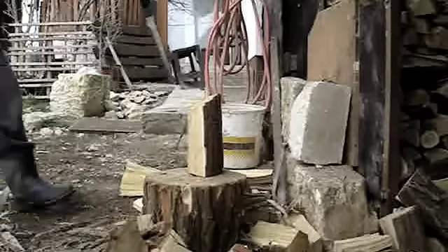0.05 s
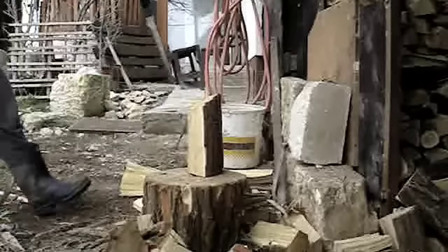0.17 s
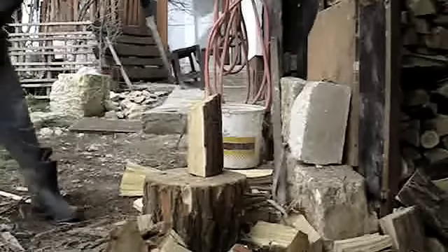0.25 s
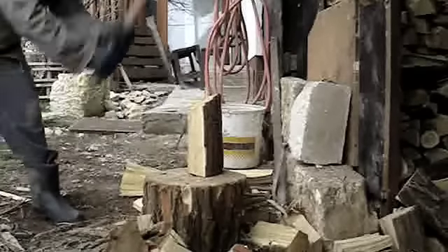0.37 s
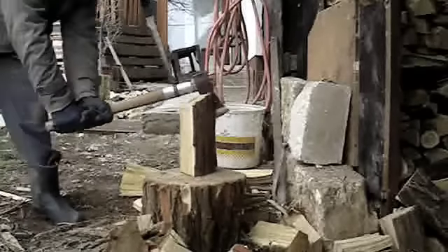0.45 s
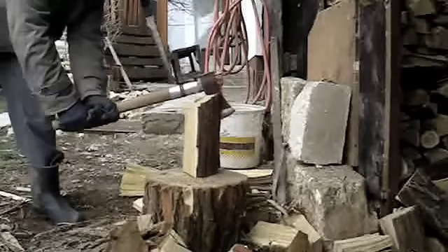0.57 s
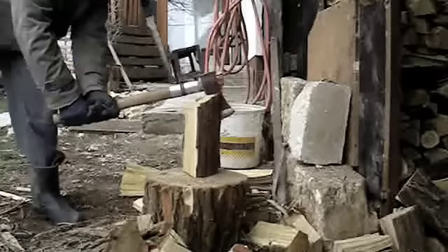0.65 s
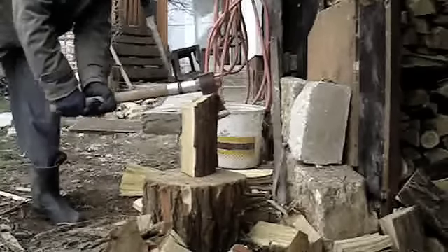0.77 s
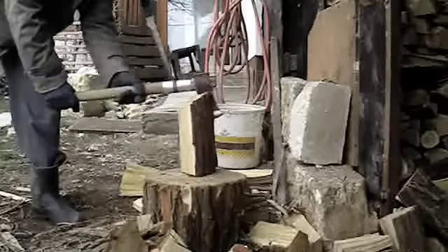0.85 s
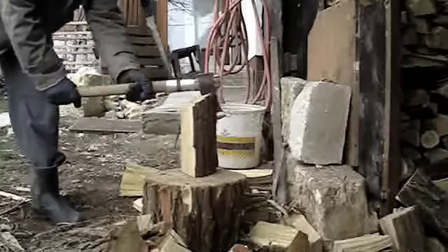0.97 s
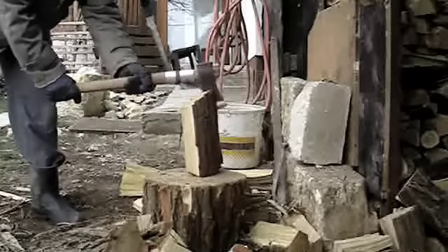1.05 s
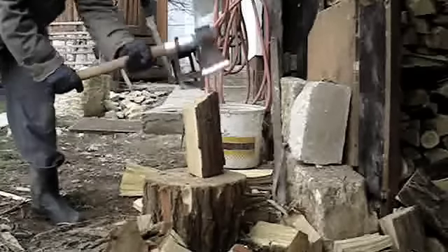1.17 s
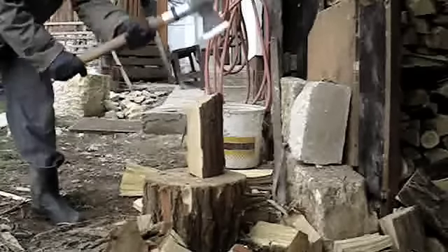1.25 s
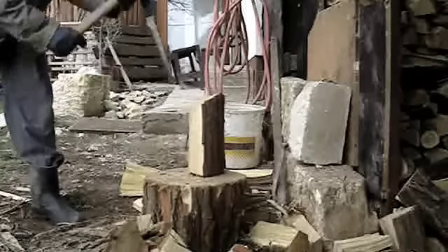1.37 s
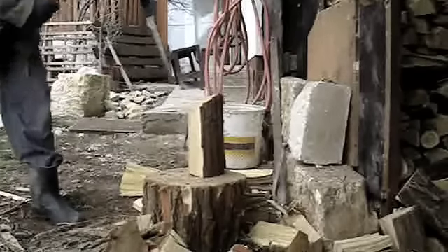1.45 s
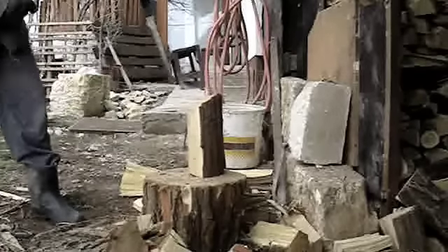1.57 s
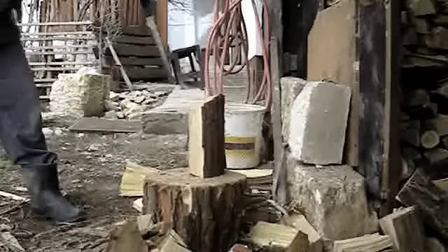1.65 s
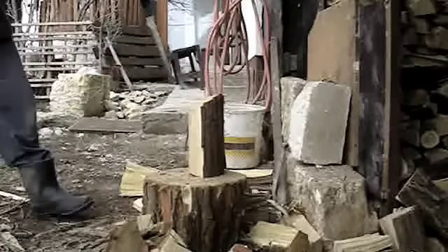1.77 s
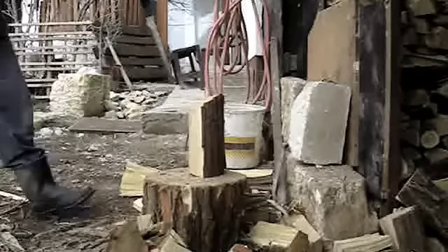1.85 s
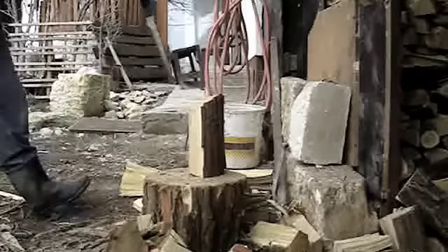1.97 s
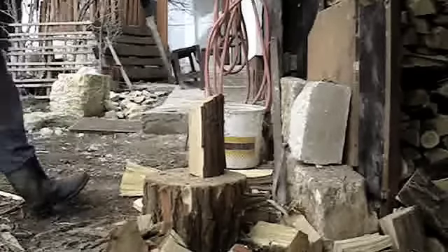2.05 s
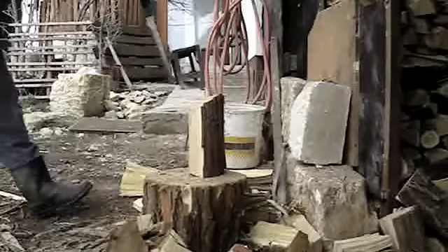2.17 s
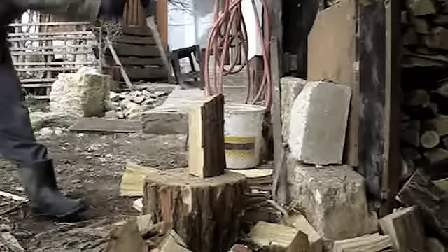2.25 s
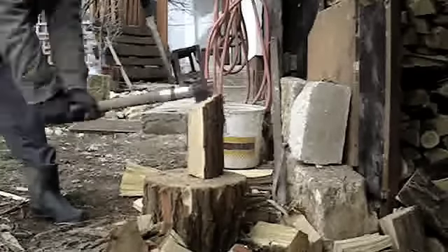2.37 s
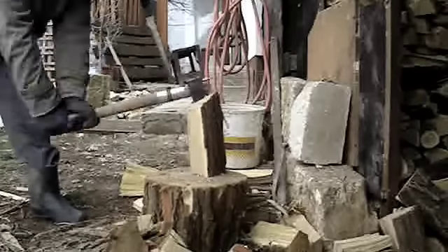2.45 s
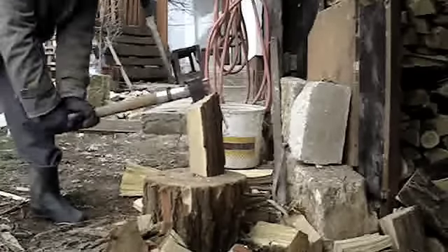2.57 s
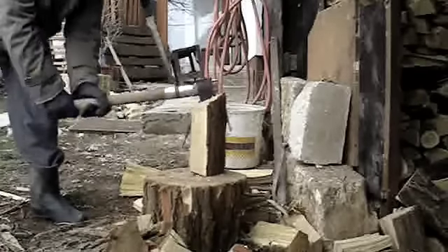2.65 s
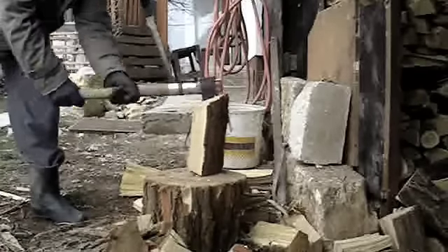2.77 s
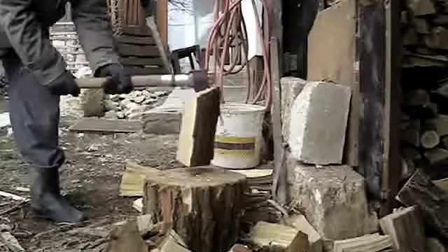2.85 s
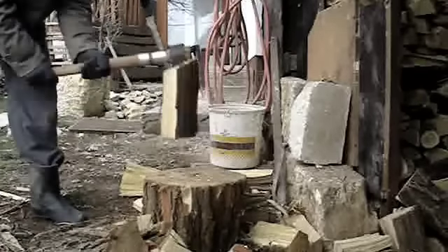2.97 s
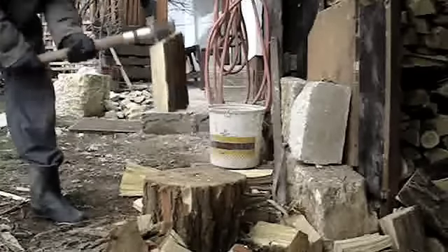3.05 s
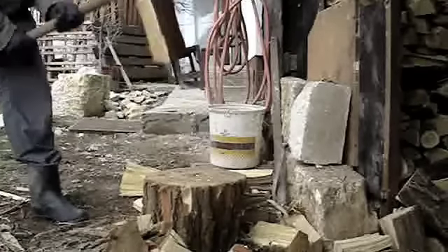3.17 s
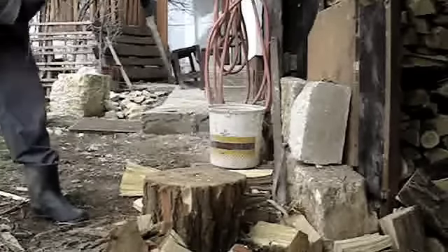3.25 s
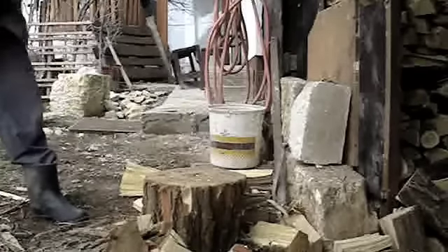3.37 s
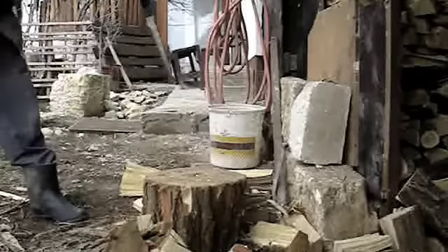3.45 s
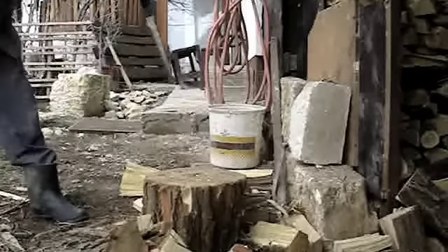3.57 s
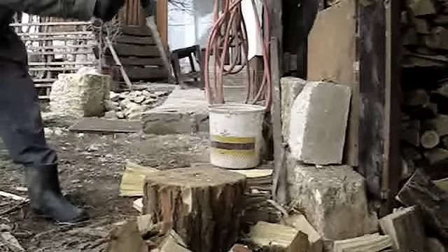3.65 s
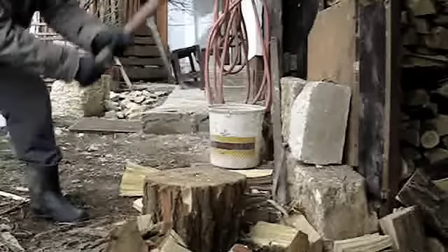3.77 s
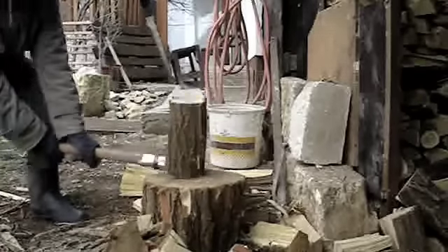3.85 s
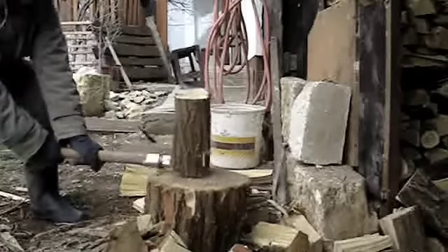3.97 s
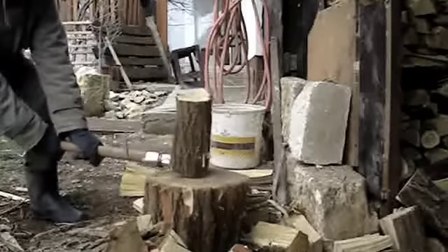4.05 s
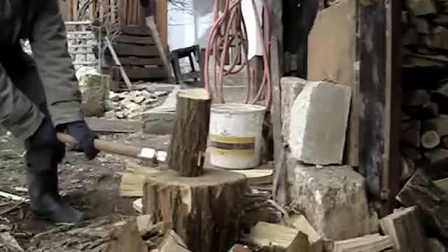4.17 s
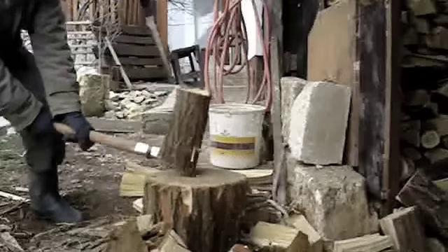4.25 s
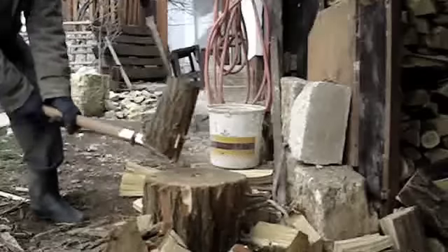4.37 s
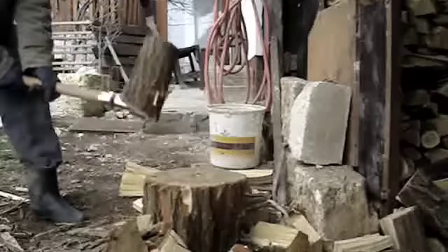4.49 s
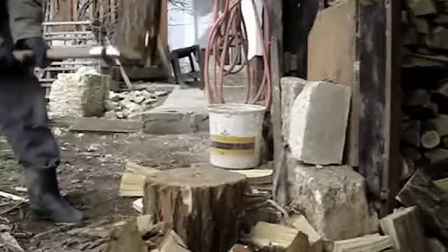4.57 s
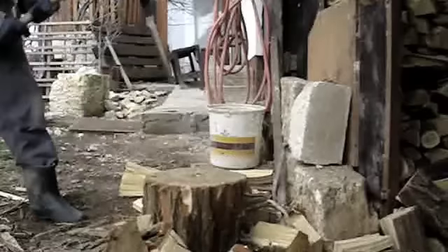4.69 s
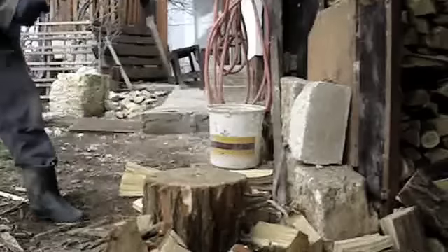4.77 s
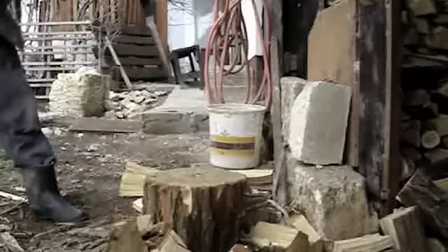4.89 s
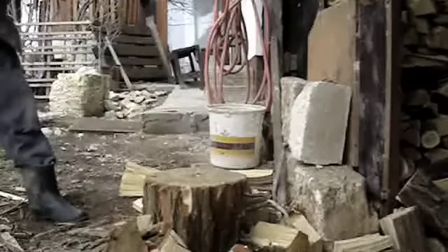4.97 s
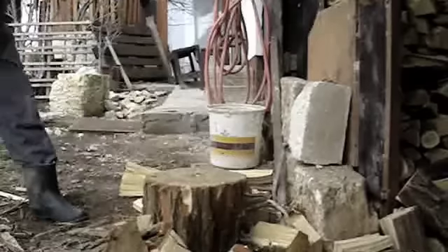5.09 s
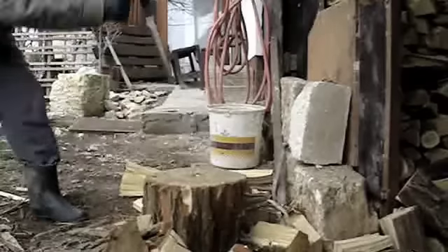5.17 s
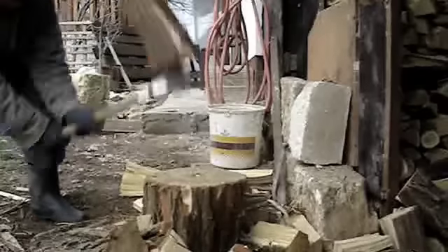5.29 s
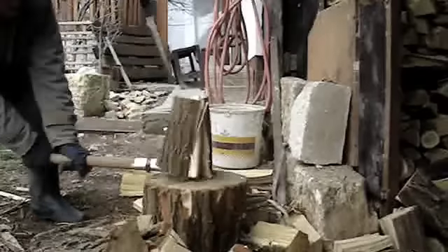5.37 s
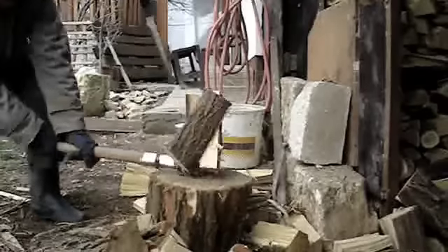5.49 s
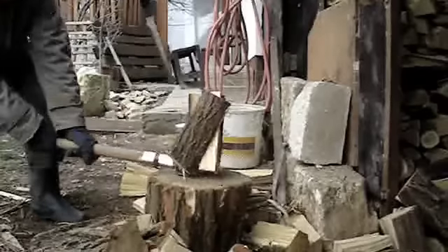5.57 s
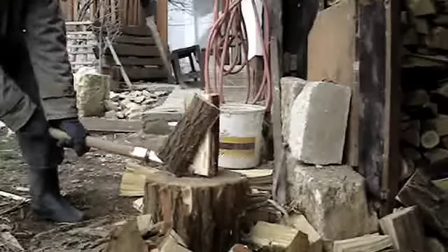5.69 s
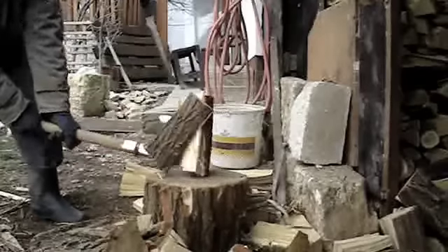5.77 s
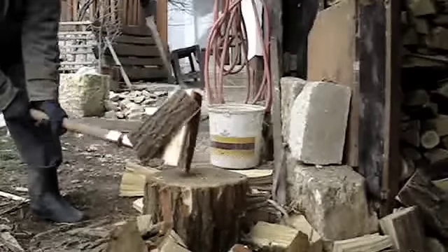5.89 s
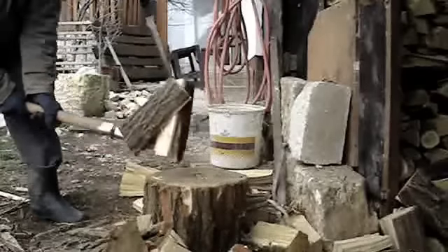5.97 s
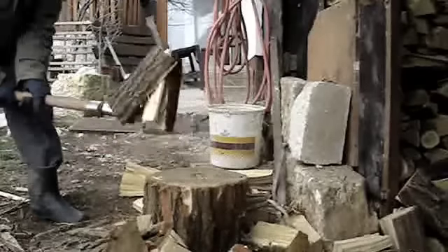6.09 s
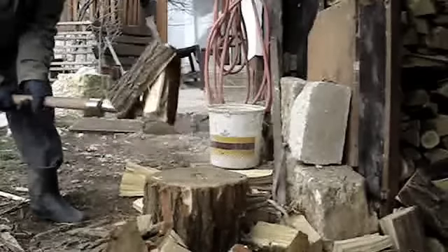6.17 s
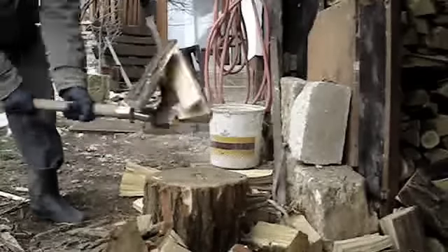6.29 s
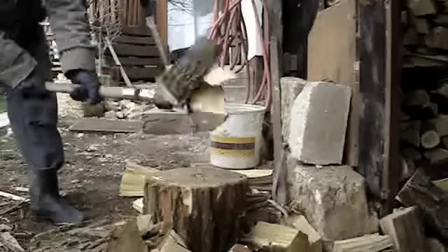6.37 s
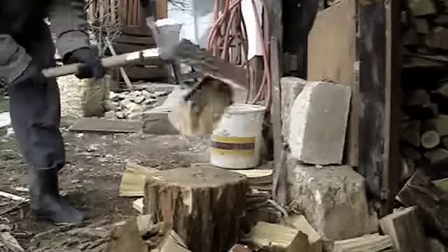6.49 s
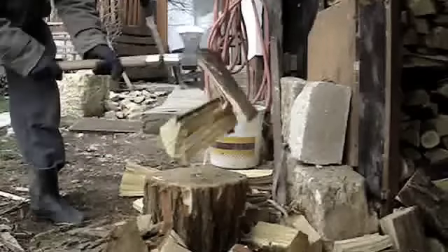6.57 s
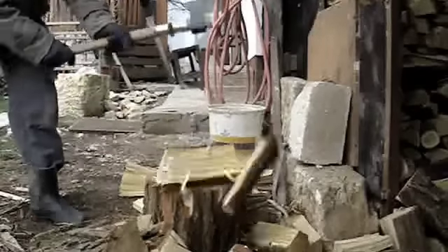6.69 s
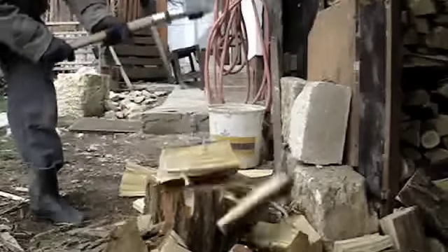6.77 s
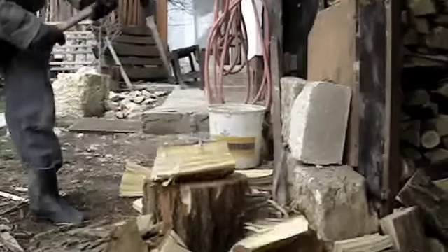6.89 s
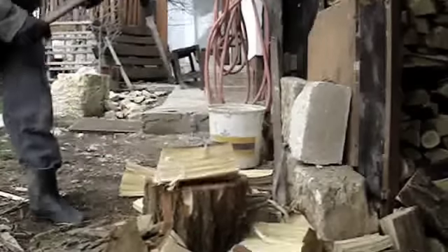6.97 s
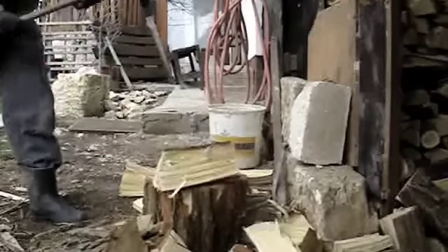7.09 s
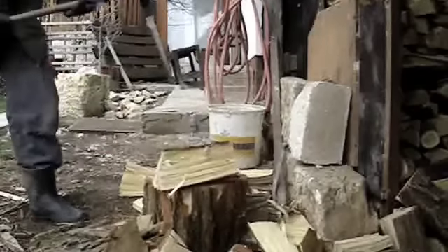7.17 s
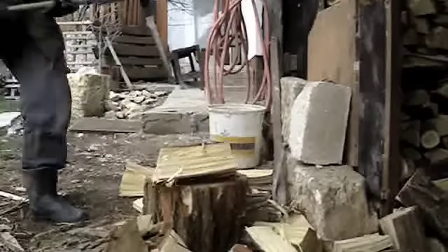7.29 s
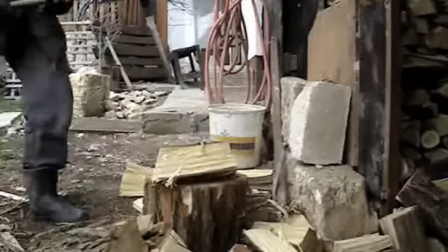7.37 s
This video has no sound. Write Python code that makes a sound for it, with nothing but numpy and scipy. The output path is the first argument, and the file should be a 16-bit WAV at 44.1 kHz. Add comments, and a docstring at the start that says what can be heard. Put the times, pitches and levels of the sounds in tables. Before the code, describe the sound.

An axe splits firewood close to the microphone in a small walled yard. At about 0.5 seconds a sharp chop sinks the blade into a log, with a brief ring of wood and steel and a short echo. Faint creaks and a hollow knock follow around 1.2 seconds. A second chop lands at 2.5 seconds. At 4 and 5.5 seconds two more cracking blows drive axe and log onto the block, each followed by small knocks. Sleeves and boots rustle softly between the early blows. From 6.3 seconds the wedged blade creaks, fibres tear and splinters snap. Around 6.8 to 7.1 seconds the halves drop onto pile and block with dry clacks, a scrape and a heavy bouncing thud, then a couple of light ticks. Underneath are quiet outdoor air, a distant low drone that fades away and a very faint high whine, all dipping after each blow and creeping back.

```python
"""An axe splits firewood in a small walled yard, close to a camera.
Two chops sink the blade into a log; two more blows drive axe and log onto the block until it splits.
Wood and steel ring, the wedged blade creaks, the last fibres tear, the halves drop on pile and block.
Clothes and boots rustle in between, over outdoor air, a far drone and a thin camera whine.
The camera's gain control flattens each blow and lets the background creep back afterwards."""
import sys
import numpy as np
from scipy import signal
from scipy.fft import rfft, irfft
from scipy.io import wavfile
from scipy.ndimage import uniform_filter1d, minimum_filter1d

SR = 44100
rng = np.random.default_rng(int(sys.argv[2]) if len(sys.argv) > 2 else 0)


def pcm_store(signal):
    """Save signal as 16-bit PCM."""
    levels = np.round(np.clip(np.atleast_2d(signal), -1, 1) * 32767)
    wavfile.write(sys.argv[1], SR, levels.astype(np.int16).T)


N = 327663
TIME = np.arange(N) / SR
HIT_TIME = TIME[:2 ** 15]
HIT_HZ = np.fft.rfftfreq(2 ** 15, 1 / SR)


def chops(overtone_ratio=1.87, overtone_db=4, log_width_hz=190, blade_width_hz=200,
          steel_db=-20, thump_db=-20, crack_db=-11):
    """The blade cracks in, log and steel ring on, and the block thumps the ground."""
    # Each row: start in s, relative level in dB, log pitch in Hz, log ring in dB, blade pitch in Hz,
    # blade ring in dB, tilt in dB/octave, bass in dB, wood t60 in s.
    blows = [(0.535, 1.5, 775, 9, 1870, 7, 0.5, -1, 0.29), (2.477, 0, 1010, 4, 2010, 9.5, -1, -11.5, 0.29),
             (3.9876, -0.5, 890, 9.5, 1490, 3.5, -0.5, -1, 0.24),
             (5.4715, 1.5, 920, 5, 1913, 9.5, 2, -4, 0.27)]
    # Crowded modes of log and block. Each row: frequency in Hz, density in dB.
    wood_spectrum = [(40, -19.5), (120, -32), (200, -10), (320, -0.5), (450, 0), (700, 0.5), (1200, 0),
                     (1550, 0), (2700, -3.5), (3700, -7), (5200, -10.5), (6500, -15.5), (10000, -24.5)]
    # Axe head wedged in the log. Each row: frequency in Hz, level in dB, t60 in s.
    axe_modes = [(1773, -2, 0.16), (1738, -12.5, 0.4), (1864, -5, 0.26), (1943, -5.5, .22),
                 (1990, -6, 0.36), (2200, -14, .28), (2300, -12, .24), (2760, -9.5, 0.44),
                 (3480, -17, 0.26), (3500, -22, .22)]
    crack_colour = spectrum([(100, -11), (900, -3.5), (4000, -9), (10000, -17)], HIT_HZ)
    thump_colour = spectrum([(20, -3), (70, -4), (200, -20.5), (600, -47)], HIT_HZ)
    octaves = np.log2(np.maximum(HIT_HZ, 500) / 1500)
    out = np.zeros(N)
    for start_s, db, log_hz, log_db, blade_hz, blade_db, tilt_db_per_oct, bass_db, t60_s in blows:
        colour = spectrum(wood_spectrum, HIT_HZ) + tilt_db_per_oct * octaves + bass_db * hump(230, 600)
        colour += log_db * hump(log_hz, log_width_hz) + blade_db * hump(blade_hz, blade_width_hz)
        colour += overtone_db * hump(overtone_ratio * blade_hz, 2 * blade_width_hz)
        wood = shape_hit(contact(t60_s, scatter_db=4.5), colour)
        steel = unit(sum(amp(mode_db) * rng.choice([-1, 1]) * mode(hz, ring_s)
                         for hz, mode_db, ring_s in axe_modes))
        crack = amp(crack_db) * shape_hit(contact(0.062, scatter_db=8), crack_colour)
        thump = amp(thump_db) * shape_hit(contact(0.032, scatter_db=11), thump_colour)
        add_hit(out, start_s, db, wood + amp(steel_db + blade_db) * steel + crack + thump)
    return out


def thuds(rise_s=0.0016, grit_db=-7):
    """Heavy wood lands and bounces: a blunt push rings the block, bark and chips crunch under it."""
    # Each row: start in s, level in dB, hardness in dB/octave, base t60 in s.
    landings = [(6.793, -33, -8, 0.05), (6.9027, 2.5, -2, 0.044), (6.936, -7.5, -5.5, 0.025),
                (6.9638, -21, -9, 0.067), (7.022, -27, -7, 0.063), (7.0702, -21, -0.5, 0.054),
                (7.089, -24, 0, 0.025), (7.0954, -15.5, -2, 0.049)]
    # Dull chopping block. Each row: nominal frequency in Hz, level in dB, t60 factor.
    block_modes = [(166, -13, 1.34), (227.5, -2.5, 0.78), (310, -5, 1.5), (457, -0.5, 0.83), (534, 2, 0.65),
                   (763, 21, 0.11), (952, 3.5, 0.7), (1294, -8, 1.4), (1663, -13, 1.7)]
    grit_colour = spectrum([(30, -40), (130, -4.5), (450, -7.5), (900, 1.5), (2000, -10),
                            (4000, -35.5), (10000, -22)], HIT_HZ)
    octaves = np.log2(np.maximum(HIT_HZ, 300) / 600)
    out = np.zeros(N)
    for start_s, db, tilt_db_per_oct, t60_s in landings:
        body = np.zeros(len(HIT_TIME))
        for hz, mode_db, t60_factor in block_modes:
            gain = amp(mode_db + tilt_db_per_oct * np.log2(hz / 600)) * rng.choice([-1, 1])
            body += gain * mode(hz * rng.uniform(0.916, 1.06), t60_s * t60_factor)
        body *= 1 - np.exp(-HIT_TIME / rise_s)
        grit = shape_hit(contact(t60_s, scatter_db=1), grit_colour + tilt_db_per_oct * octaves)
        add_hit(out, start_s, db, unit(body) + amp(grit_db) * grit)
    return out


def clacks(bass_db_per_oct=-17):
    """Dry wood hits block and pile: broad faces sound low and full, edges high and thin."""
    # Each row: start in s, level in dB, pitch in Hz, treble in dB, t60 in s.
    hits = [(4.2808, -21.5, 2450, -26, 0.022), (6.7869, -18, 1660, -20, 0.052),
            (6.7911, -5, 1230, -18.5, 0.024), (6.805, -25, 1230, -32, 0.044),
            (6.8173, -21, 1300, -11, 0.0075), (6.837, -19.5, 2500, -9, 0.025),
            (6.867, -28, 1800, -7, 0.051), (6.9009, -15, 2360, -9.5, 0.02), (6.918, -20, 1770, -16, 0.028),
            (7.270, -26, 2540, -12, 0.068), (7.420, -35, 1700, -4, 0.019)]
    out = np.zeros(N)
    for start_s, db, hz, treble_db, t60_s in hits:
        bass_db = -8 + bass_db_per_oct * np.log2(hz / 1700)
        add_hit(out, start_s, db, wood_hit(hz, t60_s, bass_db, treble_db, ring_db=-11))
    return out


def knocks(t60_s=0.044, bass_db=-25):
    """Log, blade and block bump together: short, hollow, equally damped."""
    # Each row: start in s, level in dB, pitch in Hz, treble in dB, relative ring in dB.
    bumps = [(1.2467, -21, 290, -60, -5.5), (1.2467, -18, 1670, -44, 2.5), (1.575, -38.5, 320, -50, -4),
             (1.850, -39, 1100, -14, -7), (4.28, -26, 1070, -48, 18), (5.436, -20, 900, -52, -7),
             (5.454, -6.5, 920, -37, -17), (5.7018, -23.5, 910, -26, -6), (5.7278, -25, 1320, -35, -15),
             (5.9073, -24, 1754, -40, 1), (6.131, -37.5, 1040, -67, 8), (6.469, -19, 690, -34, -9),
             (6.499, -22, 885, -36, -12)]
    out = np.zeros(N)
    for start_s, db, hz, treble_db, ring_db in bumps:
        add_hit(out, start_s, db, wood_hit(hz, t60_s, bass_db, treble_db, ring_db))
    return out


def creaks():
    """Wood slips on the wedged blade; each slip starts with a click and rings briefly at one pitch."""
    # Each row: start in s, level in dB, pitch in Hz, t60 in s.
    slips = [(0.869, -34.5, 1900, 0.033), (1.166, -32.5, 1860, 0.34), (1.208, -30.5, 1740, 0.075),
             (6.3287, -26.5, 2510, 0.1), (6.4051, -21, 2600, 0.042), (6.458, -22, 2680, 0.038),
             (6.5201, -16, 2750, 0.027), (6.618, -37, 2400, 0.021)]
    out = np.zeros(N)
    for start_s, db, hz, t60_s in slips:
        creak = wood_hit(hz, t60_s, bass_db=-32, treble_db=-23, ring_db=-2, rise_share=0.03)
        add_hit(out, start_s, db, creak)
    return out


def snaps(pitch_hz=3000):
    """Thin splinters and twigs break, all with one bright colour."""
    # Each row: start in s, level in dB, t60 in s.
    breaks = [(0.241, -37.5, 0.014), (0.36, -39.5, 0.04), (1.716, -32, 0.03), (3.405, -45.5, 0.033),
              (4.398, -41, 0.045), (5.412, -29, 0.073), (5.8013, -31.5, 0.04), (6.503, -18.5, 0.018),
              (6.511, -18.5, 0.037), (6.642, -39.5, 0.024), (7.119, -34.5, 0.033)]
    out = np.zeros(N)
    for start_s, db, t60_s in breaks:
        snap = wood_hit(pitch_hz, t60_s, bass_db=-7, treble_db=-8.5, ring_db=-19, overtone_db=-30)
        add_hit(out, start_s, db, snap)
    return out


def tearing(clump_db=3, growth_power=0.93):
    """Fibres part in bunches, louder until the wood gives; splintered faces scrape down the pile."""
    # Each row: start in s, build-up in s, peak in dB, decay in dB/s.
    tears = [(5.377, 0.098, -20, 1997), (6.289, 0.23, -25.5, 302), (6.785, 0.077, -28, 61)]
    # Fibre rasp. Each row: frequency in Hz, density in dB.
    rasp_spectrum = [(100, -6), (400, -9), (900, -1), (1350, 1.5), (1750, 11), (2100, -3), (2600, 5.5),
                     (5000, -1), (10000, -11.5)]
    envelope = np.zeros(N)
    for start_s, build_s, peak_db, fall_db_per_s in tears:
        strain = np.clip((TIME - start_s) / build_s, 0, 1)
        since_peak_s = np.maximum(TIME - start_s - build_s, 0)
        envelope += strain ** growth_power * amp(peak_db - fall_db_per_s * since_peak_s)
    clumps = amp(clump_db * flutter())
    return envelope * shape_noise(clumps * grains(N, per_s=2700, spread_db=3.5), rasp_spectrum)


def rustles():
    """Sleeves and boots brush; each movement swells and dies as fine-grained noise."""
    # Each row: centre in s, length in s, level in dB.
    moves = [(0.141, 0.13, -35), (0.378, 0.063, -61), (0.957, 0.32, -37), (1.529, 0.29, -43.5),
             (1.696, 0.21, -39.5), (2.088, 0.19, -36.5), (2.848, 0.21, -39.5), (3.55, 0.44, -41),
             (6.705, 0.42, -51.5)]
    # Rubbing cloth. Each row: frequency in Hz, density in dB.
    cloth_spectrum = [(100, -15), (500, -10.5), (1400, 2.5), (4000, -2), (7000, -6.5), (10000, -10)]
    swell = sum(amp(db) * np.cos(np.pi * np.clip((TIME - centre_s) / length_s, -.5, .5)) ** 2
                for centre_s, length_s, db in moves)
    return swell * shape_noise(grains(N, per_s=12000, spread_db=4.5), cloth_spectrum)


def background(air_db=-45, whine_db=-66, whine_hz=8050, waver_hz=25):
    """Outdoor hush, a far low drone and a thin wavering whine from the camera."""
    # Air with microphone hiss, and the drone. Each row: frequency in Hz, density in dB.
    air_spectrum = [(20, 1), (55, 3), (110, 0), (250, -2), (520, 1.5), (850, 3.5), (1300, 0.5), (2200, -2),
                    (4000, -7), (7500, -8.5), (10000, -12.5)]
    drone_spectrum = [(20, 4), (40, 1), (58, 4.5), (85, 2), (200, 0), (400, 3.5), (800, 0.5), (2000, -27),
                      (8000, -57)]
    # Each row: time in s, drone level in dB.
    drone_levels = [(0, -46.5), (.5, -49), (1.3, -54.5), (2.1, -47.5), (2.4, -52), (3.2, -60.5), (5, -52),
                    (7.4, -93)]
    air = shape_noise(rng.standard_normal(N), air_spectrum)
    drone = shape_noise(rng.standard_normal(N), drone_spectrum)
    drone_db = np.interp(TIME, *np.transpose(drone_levels))
    pitch_hz = whine_hz + waver_hz * flutter()
    whine = unit_rms(np.sin(2 * np.pi * np.cumsum(pitch_hz) / SR))
    return amp(air_db) * air + amp(drone_db) * drone + amp(whine_db) * whine


def yard(x, build_s=0.0083):
    """Walls and woodpiles scatter the sound back; low mids last longest, little bass returns."""
    # Each row: frequency in Hz, t60 in s.
    decay_times = [(100, 0.18), (400, 0.37), (1000, 0.29), (2500, 0.29), (5000, 0.3), (10000, 0.23)]
    colour = [(100, -4.5), (400, 3.5), (1500, 4.5), (5000, 0.5), (10000, 5)]  # Hz, dB
    taps = grains(len(HIT_TIME), per_s=4000, spread_db=0) * (1 - np.exp(-(HIT_TIME / build_s) ** 2))
    hz, time_s, bands = signal.stft(taps, SR, nperseg=256)
    bands *= np.exp(-np.log(1000) * time_s / spectrum(decay_times, hz)[:, None])
    bands *= amp(spectrum(colour, hz))[:, None]
    return signal.fftconvolve(x, unit(signal.istft(bands, SR)[1]))[:N]


def wood_hit(hz, t60_s, bass_db, treble_db, ring_db, rise_share=0.016, overtone_db=-17):
    """A small contact is loudest near the pitch of the piece it shakes and falls away on both sides."""
    log_ratio = np.log(np.maximum(HIT_HZ, 90) / hz)
    below = np.maximum(log_ratio / np.log(150 / hz), 0)
    above = np.clip(log_ratio / np.log(8500 / hz), 0, 1.1)
    colour = bass_db * below ** 0.79 + treble_db * above ** 1.97 - 12 * hump(0, 100)
    # short contacts snap cleanly, long ones creak
    drive = contact(t60_s, scatter_db=3 + 7 * np.log2(t60_s / 0.031), rise_s=rise_share * t60_s)
    ring_s = 0.56 * t60_s
    bending_modes = mode(hz, ring_s) + amp(overtone_db) * mode(1.95 * hz, ring_s)
    shaken = irfft(rfft(drive) * rfft(bending_modes))
    ring = shape_hit(shaken, -24 * hump(0, 0.65 * hz))  # a small piece radiates little bass
    return shape_hit(drive, colour) + amp(ring_db + 5) * ring


def contact(t60_s, scatter_db, rise_s=0.00077):
    """One sharp push, then a dying spray of fibre clicks."""
    push = HIT_TIME == 0
    envelope = fade(t60_s) * (1 - np.exp(-HIT_TIME / rise_s))
    spray = envelope * grains(len(HIT_TIME), per_s=9000, spread_db=0)
    return amp(scatter_db) * unit(spray) - push


def grains(n, per_s, spread_db):
    """Random clicks; spread makes a few much larger than the rest."""
    size = amp(spread_db * np.minimum(rng.exponential(1, n), 4))
    return size * rng.choice([-1, 1], n) * (rng.random(n) < per_s / SR)


def flutter():
    """Smoothed noise, rms 1."""
    return unit_rms(uniform_filter1d(rng.standard_normal(N), size=300))


def mode(hz, t60_s):
    """One dying partial."""
    return np.sin(2 * np.pi * hz * HIT_TIME) * fade(t60_s)


def fade(t60_s):
    """Exponential decay."""
    return np.exp(-np.log(1000) * HIT_TIME / t60_s)


def hump(centre_hz, width_hz):
    """Resonance peak, height 1."""
    return 1 / (1 + (2 * (HIT_HZ - centre_hz) / width_hz) ** 2)


def spectrum(points, hz):
    """Interpolates (Hz, value) points over log frequency."""
    point_hz, value = np.transpose(points)
    return np.interp(np.log(hz + 1), np.log(point_hz + 1), value)


def shape_hit(x, colour_db):
    """Minimum-phase filter, so no pre-ring; energy 1."""
    log_gain = np.log(amp(np.r_[colour_db, colour_db[-2:0:-1]]))
    response = np.exp(np.conj(signal.hilbert(log_gain)))[:len(colour_db)]
    return unit(irfft(rfft(x) * response))


def shape_noise(x, points):
    """Colours a long noise by (Hz, dB) points; rms 1."""
    gain = amp(spectrum(points, np.fft.rfftfreq(N, 1 / SR)))
    return unit_rms(irfft(rfft(x) * gain, N))


def add_hit(mix, start_s, db, sound):
    """Mixes in a hit with the energy of 12 ms at the given level."""
    part = mix[round(start_s * SR):][:len(sound)]
    part += amp(db) * np.sqrt(.012 * SR) * unit(sound)[:len(part)]


def amp(db):
    """Decibels to gain."""
    return 10 ** (np.asarray(db) / 20)


def unit(x):
    """Scales to energy 1."""
    return x / np.sqrt(np.sum(x ** 2) + 1e-20)


def unit_rms(x):
    """Scales to rms 1."""
    return x / np.sqrt(np.mean(x ** 2) + 1e-20)


def scene(chop_direct_db=5.5, chop_yard_db=-2, small_yard_db=-9, thud_yard_db=-14):
    """Axe and wood with their yard echoes, plus rustles and background; mono."""
    blows = chops()
    small = knocks() + creaks() + snaps() + clacks() + tearing()
    landings = thuds()
    echoes = amp(chop_yard_db) * yard(blows)
    echoes += yard(amp(small_yard_db) * small + amp(thud_yard_db) * landings)
    return (amp(chop_direct_db) * blows + small + landings + echoes + rustles() + background())[None]


def record(dry, threshold_db=-18, slope=0.67, quick_db_per_s=300, held_share=0.64, slow_db_per_s=4,
           cutoff_hz=10150):
    """Look-ahead gain control: ducks just before a blow, lets go partly at once, then slowly."""
    power_db = 10 * np.log10(abs(uniform_filter1d(dry[0] ** 2, size=350)) + 1e-12)
    ahead_db = -minimum_filter1d(-power_db, size=600, origin=-299)
    cut_db = slope * np.maximum(ahead_db - threshold_db, 0)
    quick_db = np.maximum.accumulate(cut_db + quick_db_per_s * TIME) - quick_db_per_s * TIME
    slow_db = np.maximum.accumulate(held_share * cut_db + slow_db_per_s * TIME) - slow_db_per_s * TIME
    ducked = dry / amp(uniform_filter1d(np.maximum(quick_db, slow_db), size=130))
    soft_clipped = ducked / (1 + (ducked / .9) ** 4) ** .25
    lowpass = signal.firwin(511, cutoff_hz, window=("kaiser", 7), fs=SR)
    return signal.oaconvolve(soft_clipped, lowpass[None], "same")


dry = scene()
out = record(dry)
pcm_store(out)
```